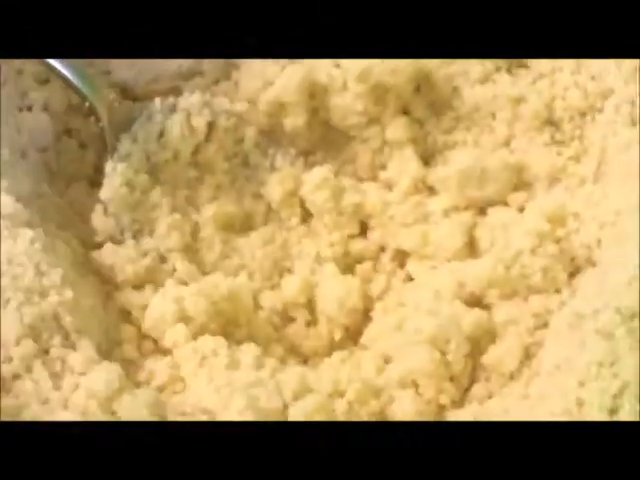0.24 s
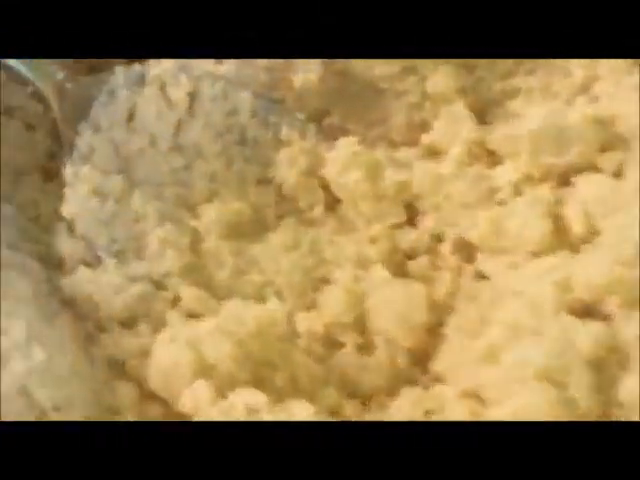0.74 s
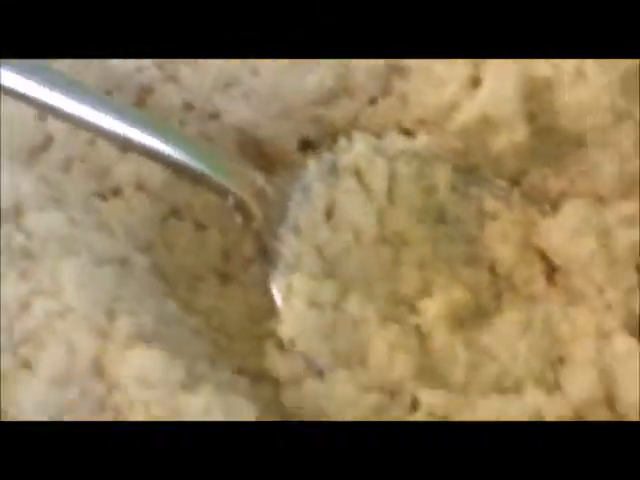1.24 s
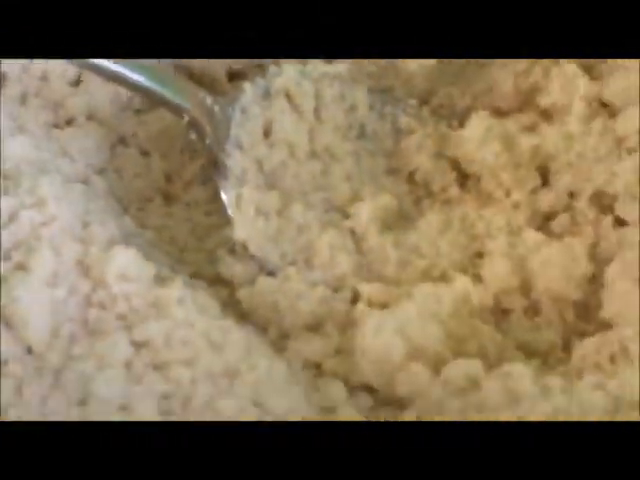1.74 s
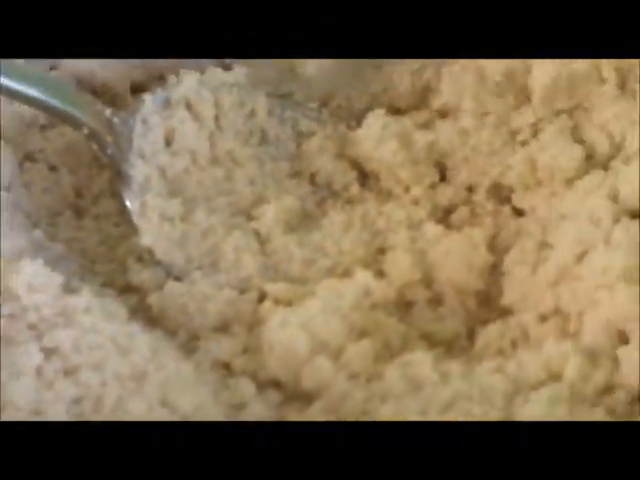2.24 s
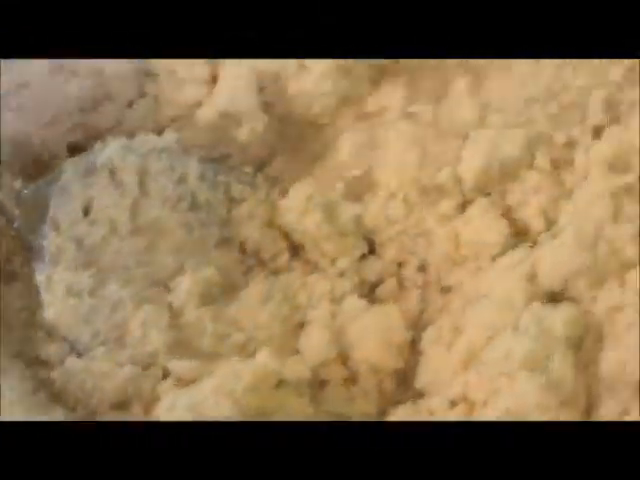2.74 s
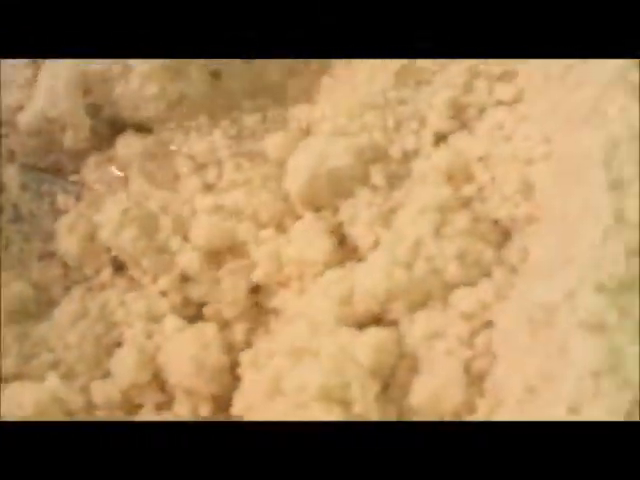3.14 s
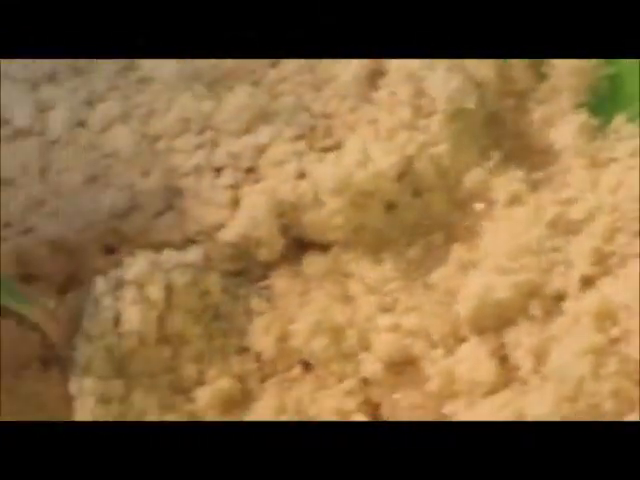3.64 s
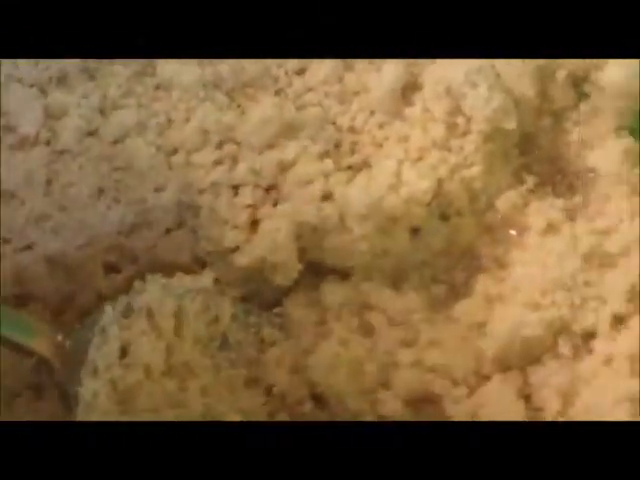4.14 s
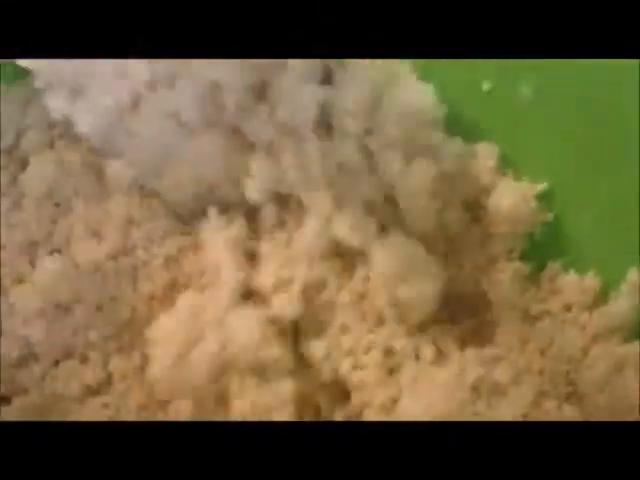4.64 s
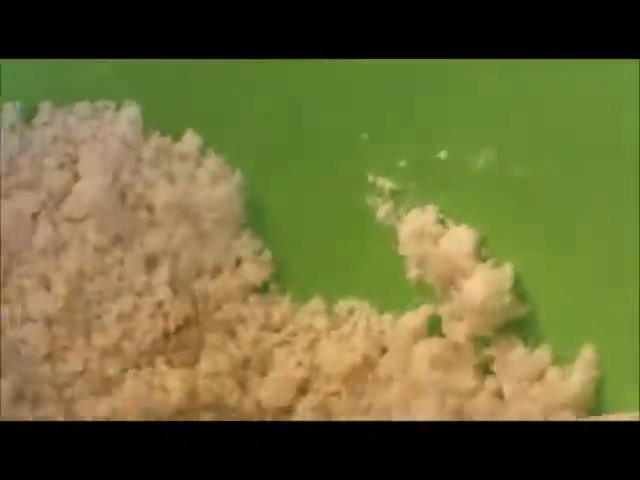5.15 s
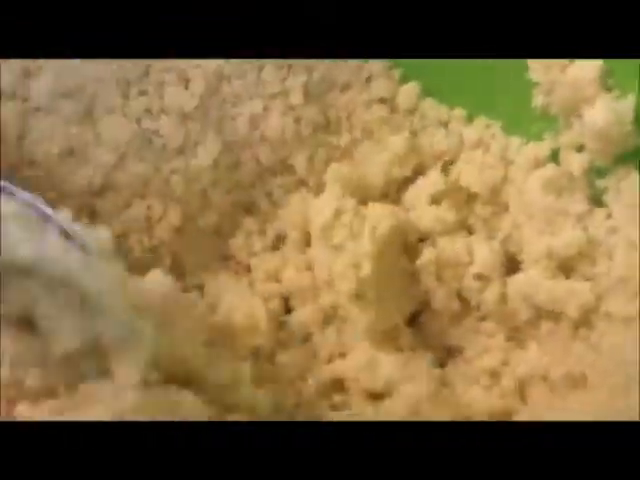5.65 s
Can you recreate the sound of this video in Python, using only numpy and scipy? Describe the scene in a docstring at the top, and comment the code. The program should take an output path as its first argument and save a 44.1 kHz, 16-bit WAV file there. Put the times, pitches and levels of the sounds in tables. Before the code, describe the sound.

Close microphone, narrow stereo, short kitchen echo. Busy bubbly trickling with bright droplets opens, interrupted by a sharp hollow knock and rattle of a bowl. The stream nearly stops midway; for about a second small dry crackles of spoon-worked crumbs swell over soft room noise and fade. Water abruptly resumes, a second stronger knock thumps with a falling tone, briefly pulling the level down, then irregular plinks and gurgles carry on.

```python
"""Kitchen sink: a thin stream trickles and gurgles into it while crumbly dough is worked with a spoon.
Water is made of decaying bubble tones, upward sweeps and noise bursts, coloured by basin resonances.
For about a second it drops to a faint dribble, baring room hush, a mains hum and dry ticks and crackle.
Twice the plastic bowl, a set of decaying modes with noise rattle, is knocked hard and chatters on the
counter; a short sagging note follows the second knock. Gain control dips the level after loud peaks."""
import sys
import numpy as np
from scipy import signal
from scipy.fft import rfft, irfft, next_fast_len
from scipy.io import wavfile
from scipy.ndimage import uniform_filter1d, map_coordinates

SR = 44100
rng = np.random.default_rng(int(sys.argv[2]) if len(sys.argv) > 2 else 0)


def int16_out(signal):
    """Quantize to a 16-bit WAV file."""
    q = np.round(np.clip(np.atleast_2d(signal).T, -1, 1) * 32767)
    wavfile.write(sys.argv[1], SR, q.astype(np.int16))


N = 260190
TIME = np.arange(N) / SR

# Spectrum of the water. Each row: frequency in Hz, gain in dB.
WATER_SPECTRUM = [(200, -4), (330, 4.5), (430, -10), (540, 5.5), (740, 5.5), (950, -4), (1480, -5.5),
                  (2100, -11), (2700, -14), (3400, -15.5), (6200, -20.5), (10000, -21.5), (14600, -25),
                  (16000, -46)]


def from_db(db):
    """Amplitude factor of a level in dB."""
    return 10 ** (np.asarray(db) / 20)


def rms_one(x):
    """Scale to an rms of 1."""
    return x / np.sqrt(np.mean(x ** 2) + 1e-20)


def in_time(rows):
    """Interpolate each column of a curve, sample by sample; the first column is seconds."""
    s, *columns = np.transpose(rows)
    return [np.interp(TIME, s, column) for column in columns]


def colour(x, points):
    """Shape a spectrum by gains interpolated over log frequency."""
    hz, db = np.transpose(points)
    size = next_fast_len(len(x) + 4096)
    bins_hz = np.maximum(np.fft.rfftfreq(size, 1 / SR), 1)
    gain = from_db(np.interp(np.log(bins_hz), np.log(hz), db))
    return irfft(rfft(x, size) * gain, size)[:len(x)]


def cut(x, hz, kind, order=2):
    """Butterworth filter."""
    sos = signal.butter(order, np.clip(hz, 10, SR * 9 / 20), kind, fs=SR, output="sos")
    return signal.sosfilt(sos, x + 1e-18)


def resonate(x, hz, width_hz):
    """Two-pole resonance with a peak gain of about 1."""
    r = np.exp(-np.pi * width_hz / SR)
    zeros = np.array([1, 0, -1]) * (1 - r * r) / 2
    poles = [1, -2 * r * np.cos(2 * np.pi * hz / SR), r * r]
    return signal.lfilter(zeros, poles, x + 1e-18)


def add(track, s, sound):
    """Mix a sound into a track at a time in seconds."""
    at = max(round(s * SR), 0)
    track[at:at + len(sound)] += sound[:max(N - at, 0)]


def reflections(t60_s):
    """Dense echoes as decaying noise, with an energy of 1."""
    t = TIME[:int(t60_s * SR)]
    echoes = rng.standard_normal(len(t)) * from_db(-60 * t / t60_s) * (1 - np.exp(-t / 0.0013))
    return echoes / np.sqrt(np.sum(echoes ** 2))


def reverberate(x, t60_s):
    """Echoes of a signal, without the direct sound."""
    return signal.fftconvolve(x, reflections(t60_s))[:len(x)]


def random_clicks(per_s, spread_db, most):
    """Times and signed sizes of random clicks; sizes spread exponentially in dB."""
    born = np.flatnonzero(rng.random(N) < per_s / SR)
    sizes = from_db(spread_db * np.minimum(rng.exponential(1, len(born)), most))
    return born, sizes * rng.choice([-1, 1], len(born))


def flow():
    """Share of the stream that hits the water: full during a run, a dribble otherwise."""
    runs = [(-0.1, 2.49), (3.715, 6.0)]  # Each row: opening and closing in seconds.
    open_s, close_s, dribble_db = 0.005, 0.094, -23
    running = 0
    for opens_s, closes_s in runs:
        opening = (TIME - opens_s) / open_s
        closing = 1 - (TIME - closes_s) / close_s
        running = running + np.clip(np.minimum(opening, closing), 0, 1)
    return np.maximum(running, from_db(dribble_db))


def small_bubbles(low_hz, high_hz, per_s, q, spread_db, count=22):
    """Clicks ring random bubbles in one range of sizes; the level is evened out near 1."""
    born, sizes = random_clicks(per_s, spread_db, most=4)
    dealt, out = rng.integers(0, count, len(born)), np.zeros(N)
    for k, hz in enumerate(np.geomspace(low_hz, high_hz, count)):
        clicks = np.zeros(N)
        clicks[born[dealt == k]] = sizes[dealt == k]
        out += resonate(clicks, hz, hz / q)
    out = colour(1.15 * out + reverberate(out, t60_s=0.059), WATER_SPECTRUM)
    out = rms_one(cut(out, [0.87 * low_hz, 1.19 * high_hz], "band"))
    return out / np.sqrt(uniform_filter1d(out ** 2, size=2600) + 0.0095)


def patter(per_s=80, spread_db=4.5, decay_s=0.0022, low_hz=900):
    """Droplets hit the wet basin in a dense, uneven run of tiny noise bursts; rms 1."""
    hits = (rng.random(N) < per_s / SR) * from_db(spread_db * np.minimum(rng.exponential(1, N), 3))
    envelope = signal.lfilter([1], [1, -np.exp(-1 / (decay_s * SR))], hits + 1e-18)
    bursts = envelope * rng.standard_normal(N)
    return rms_one(cut(colour(bursts, WATER_SPECTRUM), low_hz, "high"))


def trickle():
    """Gurgle, splash and fine spray follow the wobbling stream and ring the basin."""
    # Each row, in one list per run: time in seconds, relative levels of gurgle, splash and spray in dB.
    strength = [
        [(0.0, -42.5, -41.5, -45), (0.38, -51.5, -44, -49.5), (0.74, -41.5, -42.5, -47.5),
         (1.07, -49, -41.5, -51.5), (1.31, -44, -47, -51.5), (1.66, -54, -46, -48.5), (2.03, -40.5, -45, -47.5),
         (2.35, -48.5, -41, -46.5), (2.52, -49, -41, -49.5)],
        [(3.73, -45.5, -45.5, -46), (3.91, -47, -43, -46.5), (4.16, -45, -43, -50.5), (4.32, -53, -47, -50),
         (4.51, -55, -50.5, -50.5), (4.75, -45, -44.5, -53), (5.13, -58.5, -50.5, -50),
         (5.61, -45.5, -44, -47.5), (5.9, -44.5, -42.5, -47)],
    ]
    # Each row: basin resonance in Hz, width in Hz, level in dB.
    basin_modes = [(533, 71, -8), (950, 59, 5), (1490, 70, 0), (2135, 190, 4), (5860, 690, 3)]
    gurgle_db, splash_db, spray_db = in_time(np.vstack(strength))
    water = from_db(gurgle_db - 5.5) * small_bubbles(355, 1105, per_s=300, q=9.6, spread_db=4.5)
    water += from_db(splash_db - 6.0) * small_bubbles(1150, 3330, per_s=480, q=11, spread_db=5.0)
    water += from_db(spray_db - 3.5) * small_bubbles(3690, 13340, per_s=600, q=9, spread_db=6.5)
    ringing = sum(from_db(db) * resonate(water, hz, width_hz) for hz, width_hz, db in basin_modes)
    droplets = from_db(spray_db - 1.5) * patter()
    return (water + ringing + droplets) * flow()


def in_basin(sound, level_db, echo_db=-1.5, t60_s=0.088):
    """The basin walls smear a short sound; the level is the rms of its loudest moment."""
    sound = rms_one(sound) + from_db(echo_db) * rms_one(reverberate(sound, t60_s))
    return from_db(level_db) * sound / np.sqrt(uniform_filter1d(sound ** 2, size=400).max())


def plink(hz, level_db, slap_db=-6.0, slap_per_octave_db=2.0, slap_s=0.0028, size=4096):
    """A drop slaps the water and traps a bubble whose decaying tone climbs a little in pitch."""
    t = TIME[:size]
    rise_per_s = 1.8  # share of the starting pitch
    decay_s = 5.36 / hz + 0.00089  # a number of cycles plus a fixed time
    tone = np.sin(2 * np.pi * hz * (t + rise_per_s * t * t / 2))
    tone *= np.exp(-t / decay_s) * (1 - np.exp(-t / 0.00066))
    burst = rng.standard_normal(size) * np.exp(-t / slap_s) * (1 - np.exp(-t / 0.00072))
    slap = cut(resonate(burst, hz, 0.4 * hz), [0.67 * hz, 1.72 * hz], "band")
    slap_gain = from_db(slap_db + slap_per_octave_db * np.log2(hz / 1000))
    return in_basin(rms_one(tone) + slap_gain * rms_one(slap), level_db)


def spatter(low_hz, high_hz, thinning_s, per_s=900, size=4096):
    """One impact and a quickly thinning shower of droplets after it, as band-limited noise bursts."""
    t = TIME[:size]
    hits = (rng.random(size) < per_s / SR) * rng.exponential(1, size) * np.exp(-t / thinning_s)
    hits[0] += 1.5
    envelope = signal.lfilter([1], [1, -np.exp(-1 / (0.00091 * SR))], hits)
    return cut(envelope * rng.standard_normal(size), [low_hz, high_hz], "band")


def drops(bubble_db=-8.5, spray_db=0.5, splash_db=-16, spatter_db=-5.0):
    """A big drop splashes, traps a bubble and throws up a spatter of tiny ones."""
    # Each row: start in seconds, relative bubble level in dB, bubble pitch in Hz,
    # relative spray level in dB, spray pitch in Hz.
    big_drops = [(0.002, -30.5, 1980, -42.5, 4430), (0.012, -27.5, 716, -47, 3380),
                 (0.038, -24.5, 790, -59, 4000), (0.071, -24.5, 682, -37, 6800),
                 (0.122, -33, 1360, -35, 4730), (0.176, -47, 1500, -40, 4060),
                 (0.181, -36.5, 900, -45, 8500), (0.216, -33.5, 1490, -35.5, 4050),
                 (0.262, -25, 637, -64, 3920), (0.311, -28.5, 1454, -54, 3900),
                 (0.319, -34, 700, -58, 4000), (0.342, -44, 1490, -43.5, 5660),
                 (0.365, -46, 1400, -40.5, 4470), (0.383, -22.5, 1216, -42, 4600),
                 (0.408, -27.5, 830, -41.5, 8260), (0.425, -27.5, 1281, -47, 4100),
                 (0.442, -42, 1400, -44, 4700), (0.473, -22.5, 1870, -42.5, 4570),
                 (0.503, -29.5, 900, -56, 4500), (0.608, -18.5, 2060, -60, 4000),
                 (0.62, -24, 1600, -42, 2400), (0.636, -28, 1250, -46, 2200), (0.651, -23, 947, -44, 5460),
                 (0.743, -29.5, 2420, -49, 3940), (0.752, -40, 1920, -37, 4500),
                 (0.781, -23, 581, -58, 6000), (0.819, -16, 953, -33, 1910), (0.827, -25, 1840, -65, 3400),
                 (0.856, -24, 1320, -56, 3240), (0.862, -32, 2100, -55, 4000),
                 (0.892, -28, 1000, -60, 4000), (0.924, -35, 2000, -55, 4500),
                 (0.937, -31.5, 910, -43, 8540), (0.954, -23.5, 674, -68, 3440),
                 (1.013, -34, 660, -38.5, 6040), (1.039, -27.5, 885, -53, 6100),
                 (1.043, -31, 602, -58, 5000), (1.071, -35, 1490, -41.5, 5970),
                 (1.087, -22, 2050, -38, 4120), (1.14, -23, 857, -53, 5460),
                 (1.151, -24, 1400, -44.5, 5450), (1.19, -25.5, 962, -44, 5450),
                 (1.196, -30.5, 600, -48, 3470), (1.228, -42, 1920, -34.5, 4940),
                 (1.243, -34, 560, -55, 4000), (1.274, -50, 1090, -39.5, 5780),
                 (1.321, -31, 960, -42.5, 7800), (1.322, -27, 1490, -32.5, 3080),
                 (1.34, -25, 2090, -38.5, 3870), (1.354, -27, 945, -43, 3400),
                 (1.356, -30, 1480, -40, 2400), (1.383, -36, 1300, -47, 4200),
                 (1.412, -32, 2110, -43, 4070), (1.432, -40, 1500, -46, 3500),
                 (1.467, -34, 1900, -49, 8000), (1.52, -38, 2200, -52, 3200),
                 (1.544, -19.5, 940, -46, 9500), (1.547, -30.5, 2090, -59, 4400),
                 (1.585, -30, 1500, -60, 4000), (1.594, -22, 1350, -46, 8000),
                 (1.616, -33, 1410, -39.5, 3720), (1.629, -38, 1500, -45.5, 6800),
                 (1.672, -30, 2050, -45, 8150), (1.723, -30, 2150, -65, 4000),
                 (1.742, -27.5, 535, -38, 2150), (1.777, -53, 900, -43.5, 5800),
                 (1.805, -47, 1680, -39, 4727), (1.822, -25, 903, -40, 4680),
                 (1.855, -35, 1210, -40.5, 5630), (1.865, -33, 2170, -48, 4480),
                 (1.878, -28, 910, -47, 4960), (1.9, -31, 1400, -41.5, 5860), (1.922, -29, 1010, -44, 5470),
                 (1.934, -32.5, 600, -56, 5000), (1.975, -22, 2210, -40, 6130),
                 (1.977, -28.5, 618, -48, 4000), (2.012, -28.5, 550, -58, 3980),
                 (2.035, -18, 806, -46, 6660), (2.039, -29, 1690, -46, 3580), (2.059, -45, 890, -41, 5220),
                 (2.094, -26, 1500, -47, 6460), (2.11, -23, 917, -43, 5230), (2.133, -48, 905, -32, 5480),
                 (2.16, -24, 800, -49, 5210), (2.198, -29, 1510, -57, 4000), (2.208, -30.5, 940, -56, 5000),
                 (2.224, -44, 1400, -48, 12000), (2.244, -49, 1200, -35, 5660),
                 (2.268, -33, 943, -53, 3500), (2.29, -27.5, 544, -39.5, 5070),
                 (2.322, -26.5, 542, -54, 9180), (2.358, -25, 1460, -48, 4000),
                 (2.373, -31, 910, -44, 9050), (2.381, -27, 532, -37, 4620),
                 (2.419, -25.5, 780, -39.5, 3950), (2.456, -23, 2160, -43.5, 5240),
                 (2.458, -28.5, 1410, -50, 2980), (2.471, -37, 626, -50, 9500),
                 (2.499, -25.5, 525, -47, 5400), (3.721, -23, 1384, -40, 6000),
                 (3.741, -38, 1030, -43.5, 3300), (3.761, -27.5, 991, -49, 3100),
                 (3.801, -25, 2210, -35.5, 5200), (3.843, -27, 1410, -49, 5030),
                 (3.87, -38, 1500, -41, 6500), (3.878, -34, 1020, -44, 3080),
                 (3.916, -29.5, 2180, -38, 5100), (3.943, -34, 620, -43, 3500),
                 (3.977, -25, 1780, -32, 5740), (3.994, -24, 1595, -36.5, 6330),
                 (4.001, -24.5, 2010, -43, 3820), (4.062, -21.5, 1478, -36.5, 6020),
                 (4.125, -29, 1310, -47, 7500), (4.167, -27.5, 520, -59, 4010),
                 (4.207, -23.5, 568, -48, 4170), (4.246, -33, 2200, -47, 4100),
                 (4.405, -44, 1500, -44.5, 8450), (4.534, -25, 553, -47.5, 9230),
                 (4.559, -37, 1900, -42, 4240), (4.596, -38, 1400, -39.5, 9050),
                 (4.614, -43, 1400, -45.5, 9200), (4.65, -32, 624, -48, 8000),
                 (4.681, -40, 1400, -46.5, 9500), (4.689, -19, 2070, -40, 4180),
                 (4.76, -30.5, 2440, -37.5, 6170), (4.78, -32.5, 560, -54, 6000),
                 (4.812, -32.5, 2190, -57, 9000), (4.87, -32, 1310, -54, 6400),
                 (4.874, -29, 2060, -54, 4080), (4.92, -29.5, 2150, -45, 5760),
                 (4.943, -29, 970, -40, 5500), (4.96, -30, 1440, -45, 6000), (5.011, -44, 1490, -39, 8100),
                 (5.087, -24.5, 614, -47, 4100), (5.095, -35, 2010, -46, 4240),
                 (5.112, -31, 595, -62, 5000), (5.124, -24.5, 2030, -41, 7540),
                 (5.238, -42, 814, -37, 7320), (5.268, -46, 1500, -49, 7200), (5.283, -30, 843, -59, 4300),
                 (5.324, -26.5, 646, -55, 4440), (5.331, -28.5, 1460, -41.5, 4260),
                 (5.346, -42, 1400, -49, 5500), (5.367, -34, 1430, -40.5, 5490),
                 (5.393, -32.5, 1430, -41.5, 5500), (5.441, -32.5, 508, -52, 5540),
                 (5.492, -25, 1207, -47, 4260), (5.512, -36, 1290, -42, 4180),
                 (5.556, -23.5, 1470, -45, 8480), (5.579, -19.5, 1410, -38.5, 4190),
                 (5.598, -28, 1490, -46, 8890), (5.615, -35, 1300, -38.5, 5430),
                 (5.641, -21, 2020, -42, 8800), (5.7505, -33, 1000, -26.5, 4390),
                 (5.773, -32.5, 590, -54, 5000), (5.857, -40, 1400, -48, 3600),
                 (5.889, -33, 650, -46, 5000)]
    out = np.zeros(N)
    for s, level_db, hz, mist_db, mist_hz in big_drops:
        add(out, s, plink(hz, level_db + bubble_db) + plink(mist_hz, mist_db + spray_db))
        splash = cut(spatter(740, 2380, thinning_s=0.0063), 2540, "low", order=3)
        add(out, s, in_basin(splash, level_db + splash_db))
        mist = spatter(0.6 * mist_hz, 1.54 * mist_hz, thinning_s=0.0046)
        add(out, s, in_basin(mist, mist_db + spatter_db))
    return cut(out, 400, "high", order=3)


def room_hush():
    """Steady coloured noise of the room."""
    # Each row: frequency in Hz, gain in dB.
    hush_spectrum = [(30, -26), (100, -20.5), (150, -13), (260, -10), (390, 1), (700, 1), (850, -1.5),
                     (1200, 3.5), (2400, -11), (4600, -14), (10000, -17), (12000, -17.5), (16000, -19.5)]
    return from_db(-53.5) * rms_one(colour(rng.standard_normal(N), hush_spectrum))


def mains_hum(hz=180, rms_db=-71):
    """One steady sine."""
    return from_db(rms_db) * np.sqrt(2) * np.sin(2 * np.pi * hz * TIME)


def port_hiss():
    """Independent treble noise in each microphone port."""
    return from_db(-66) * rms_one(cut(rng.standard_normal((2, N)), 5000, "high"))


def gurgles(grit_db=-5.0, grit_hz=520, rise_octaves_per_s=21.3, size=4096):
    """A big bubble swells and sweeps up in pitch as it nears the surface; churning roughens the note."""
    # Each row: start in seconds, starting pitch in Hz, length in seconds, relative level in dB.
    big_bubbles = [(0.53, 1344, 0.016, -35.5), (2.298, 1306, 0.018, -30), (2.325, 1510, 0.011, -31.5),
                   (3.784, 1306, 0.013, -35), (4.016, 510, 0.019, -30), (4.151, 1326, 0.0086, -31.5),
                   (4.25, 1380, 0.012, -38), (4.442, 1405, 0.023, -39), (4.52, 1206, 0.024, -36.5),
                   (4.642, 1182, 0.021, -30), (4.842, 1496, 0.027, -32), (5.103, 804, 0.029, -34),
                   (5.689, 1076, 0.02, -39)]
    out, t = np.zeros(N), TIME[:size]
    for s, first_hz, length_s, level_db in big_bubbles:
        age = np.clip(t / length_s, 0, 1)
        phase = 2 * np.pi * np.cumsum(first_hz * 2 ** (rise_octaves_per_s * length_s * age)) / SR
        churn = 1 + from_db(grit_db) * rms_one(cut(rng.standard_normal(size), grit_hz, "low"))
        note = churn * np.sin(phase) * np.sqrt(4 * age * (1 - age))
        add(out, s, in_basin(note, level_db, echo_db=-3.5, t60_s=0.086))
    return cut(out, 420, "high", order=3)


def knocks(thud_hz=345, thud_t60_s=0.012, rattle_t60_s=0.068, rumble_db=-73.5, rumble_t60_s=0.14,
           size=6000):
    """Dough-laden bowl modes ring and rattle over counter thud and rumble; long contacts dull the blow."""
    # Each row: start in seconds, relative level in dB, pitch factor, contact time in ms,
    # counter thud and rattle in dB relative to the knock.
    blows = [(0.549, 0.5, 1.12, 0.078, -28, -25), (.5588, -5, 1.4, 0.17, -33, -16),
             (.5648, -2.5, 1.18, 0.28, -27, -12.5), (.5718, -9, 1.13, 0.59, -41, -12),
             (.586, -15.5, 1.14, 0.35, -15, -2), (4.2785, 3.5, 0.98, 0.14, -10.5, -51),
             (4.3065, -24, 1.4, 0.4, -15, -20), (4.3316, -16.5, 1.02, 0.34, -5, -7),
             (4.364, -22, 0.97, 0.55, -12, -23), (4.4233, -15, 1.05, 0.52, -5, -30),
             (4.436, -25, 0.97, 0.5, -9, -25)]
    # Each row: mode in Hz before the pitch factor, level in dB, t60 in seconds.
    bowl_modes = [(544, 0, 0.02), (674, 1.5, 0.012), (1158, -16.5, 0.036), (785, -31, 0.033),
                  (1356, -34, 0.081), (1720, -7.5, 0.0039), (2980, -16, 0.0069), (4730, -2.5, 0.00049)]
    out, deep, t = np.zeros(N), np.zeros(N), TIME[:size]
    for s, level_db, pitch, contact_ms, thud_db, rattle_db in blows:
        ring = np.zeros(size)
        for k, (hz, db, t60_s) in enumerate(bowl_modes):
            mode = from_db(db - 60 * t / t60_s) * np.sin(2 * np.pi * hz * pitch * t)
            ring += (-1) ** k * mode
        thud = from_db(thud_db - 60 * t / thud_t60_s) * np.sin(2 * np.pi * thud_hz * t)
        rattle = rms_one(cut(rng.standard_normal(size), [800, 2400], "band"))
        rattle = from_db(rattle_db - 60 * t / rattle_t60_s) * rattle
        blow = cut(ring, 480, "high", order=1) - thud + rattle
        add(out, s, from_db(level_db) * cut(blow, 1000 / (np.pi * contact_ms), "low", order=1))
        rumble = cut(rng.standard_normal(size) * from_db(-60 * t / rumble_t60_s), 90, "low")
        add(deep, s, from_db(level_db + rumble_db) * rms_one(rumble))
    return cut(out, 270, "high", order=4) + deep


def ticks(ring_hz=1310, ring_s=0.0033, ring_db=4.5, ping_hz=2950, ping_s=0.0037, ping_db=3.5,
          snap_db=-10, snap_s=0.003, crack_db=-14, size=900):
    """Each dry tick is a broad crack and a bright snap with a hollow ring of a few cycles and a ping."""
    # Each row: start in seconds, relative levels of hollow ring, ping and snap in dB, snap pitch in Hz.
    loud_ticks = [(2.584, -54, -44, -56, 5000), (2.634, -54, -57, -47.5, 8000),
                  (2.6534, -51, -43.5, -43.5, 4700), (2.7222, -55, -58, -42.5, 9000),
                  (2.735, -53, -62, -47, 7100), (2.775, -54, -62, -53, 9500),
                  (2.789, -35.5, -60, -57, 6000), (2.8618, -39.5, -39.5, -32.5, 7000),
                  (2.881, -58, -55, -49, 5200), (2.888, -55, -58, -41, 8700),
                  (2.897, -52, -44.5, -55, 5000), (2.905, -43, -49, -39.5, 7300),
                  (2.9516, -33.5, -51, -60, 5800), (2.966, -48, -60, -50, 6540),
                  (2.978, -40, -58, -44, 7000), (2.9985, -51, -60, -40.5, 8200),
                  (3.006, -43, -46, -46, 8000), (3.026, -44, -53, -50, 6000),
                  (3.034, -36, -36.5, -39, 6300), (3.0482, -35.5, -56, -59, 5600),
                  (3.0695, -39, -57, -46, 7000), (3.0832, -32.5, -40.5, -33, 7300),
                  (3.0875, -46, -36, -55, 6000), (3.1035, -33, -51, -43, 7400),
                  (3.1092, -22, -48, -50, 5800), (3.1223, -34, -57, -50, 5600),
                  (3.127, -37, -57, -52, 6000), (3.1399, -25.5, -56, -55, 6000),
                  (3.148, -46, -56, -53, 7500), (3.159, -39, -59, -35.5, 8200),
                  (3.168, -46, -58, -44, 8300), (3.179, -34.5, -34, -54, 5000),
                  (3.203, -44, -54, -32.5, 9800), (3.2166, -28.5, -55, -50, 6500),
                  (3.2501, -25.5, -48, -52, 6000), (3.258, -43, -56, -52, 9000),
                  (3.2717, -39, -52, -52, 7000), (3.2818, -38, -56, -37.5, 7460),
                  (3.2984, -42, -51, -35, 7750), (3.3356, -41, -43.5, -37.5, 8800),
                  (3.36, -48, -65, -45, 11000), (3.3844, -56, -62, -46, 5000),
                  (3.653, -61, -67, -43.5, 10800)]
    out, t = np.zeros(N), TIME[:size]
    for s, hollow_db, high_db, bright_db, bright_hz in loud_ticks:
        tones = (ring_hz, ring_s, hollow_db + ring_db), (ping_hz, ping_s, high_db + ping_db)
        for hz, length_s, db in tones:
            detune = 1 + 0.03 * rng.standard_normal()
            envelope = np.sin(np.pi * np.clip(t / length_s, 0, 1) ** 0.37)  # fast rise, slower fall
            add(out, s, from_db(db) * np.sin(2 * np.pi * hz * detune * t) * envelope)
        burst = rng.standard_normal(size) * np.clip(1 - t / snap_s, 0, 1)
        snap = cut(burst, [0.86 * bright_hz, 1.34 * bright_hz], "band")
        add(out, s, from_db(bright_db + snap_db) * rms_one(snap))
        crack = cut(signal.unit_impulse(size), [1700, 9000], "band", order=1)
        add(out, s, from_db(bright_db + crack_db) * rms_one(crack))
    return cut(out, 490, "high")


def crackle(per_s=90, spread_db=4.2):
    """Many faint ticks, each ringing one resonance, swell, hold and die."""
    level_db, full_s, hold_s = -50, 2.99, 0.35
    rise_db_per_s, fall_db_per_s = 30, 218
    out = np.zeros(N)
    # resonance Hz, width Hz, relative level dB
    for hz, width_hz, db in [(1360, 630, 4.0), (2850, 300, -4.5), (5830, 450, 1.0),
                             (8800, 2600, 0.5), (13000, 3500, -23)]:
        born, sizes = random_clicks(per_s, spread_db, most=3)
        clicks = np.zeros(N)
        clicks[born] = sizes
        out += from_db(db) * rms_one(resonate(clicks, hz, width_hz))
    early_s = np.maximum(full_s - TIME, 0)
    late_s = np.maximum(TIME - full_s - hold_s, 0)
    swell = from_db(level_db - rise_db_per_s * early_s - fall_db_per_s * late_s)
    return rms_one(cut(out, 330, "high")) * swell


def falling_note(sag_octaves_per_s=15, t60_s=0.13, size=8000):
    """After the harder knock, a short low sine sinks in pitch as it dies."""
    # One row: start in seconds, starting pitch in Hz, level in dB.
    s, first_hz, level_db = (4.286, 790, -19.5)
    out, t = np.zeros(N), TIME[:size]
    phase = 2 * np.pi * np.cumsum(first_hz * 2 ** (-sag_octaves_per_s * t)) / SR
    add(out, s, from_db(level_db - 60 * t / t60_s) * np.sin(phase))
    return out


def kitchen(x, t60_s):
    """Reverberation, thin in the bass and dull on top."""
    return cut(reverberate(x, t60_s), [220, 7000], "band", order=1)


def microphones(x, delay_s=0.000018):
    """Two close ports: the left hears slightly later, and a diffuse part has opposite signs in them."""
    # Each row: frequency in Hz, gain of the diffuse part in dB.
    diffuse_spectrum = [(50, -20), (150, -30), (400, -38), (1000, -33), (2500, -21), (6000, -11),
                        (13000, -4)]
    side = colour(reverberate(x, t60_s=0.3), diffuse_spectrum)
    late = map_coordinates(x, [np.arange(N) - delay_s * SR], order=3, mode="nearest")
    return np.array([late + side, x - side])


def gain_control(x, threshold_db=-8.5, release_db_per_s=28.5, attack_s=0.0058):
    """A loud peak pulls the gain down a moment later, and it creeps back up."""
    peak_db = 20 * np.log10(np.abs(x).max(axis=0) + 1e-9)
    excess_db = np.maximum(peak_db - threshold_db, 0)
    released_db = release_db_per_s * TIME
    held_db = np.maximum.accumulate(excess_db + released_db) - released_db
    keep = np.exp(-1 / (attack_s * SR))
    return x * from_db(-signal.lfilter([1 - keep], [1, -keep], held_db))


def scene():
    """Water, bowl and ticks in the kitchen, over hush, hum and hiss."""
    water = trickle() + drops() + from_db(0.5) * gurgles()
    bowl = knocks() + falling_note()
    near = ticks() + crackle()
    sound = water + from_db(-6.5) * kitchen(water, t60_s=0.38)
    sound += bowl + from_db(-7.0) * kitchen(bowl, t60_s=0.35)
    sound += near + from_db(-8) * kitchen(near, t60_s=0.16)
    return microphones(sound + room_hush() + mains_hum()) + port_hiss()


def record(dry):
    """Gain control, then a steep cut of the top."""
    top_cut = signal.ellip(10, 0.2, 80, 15700, fs=SR, output="sos")  # ripple dB, stop dB, cutoff Hz
    return signal.sosfilt(top_cut, gain_control(dry))


dry = scene()
out = record(dry)
int16_out(out)
```